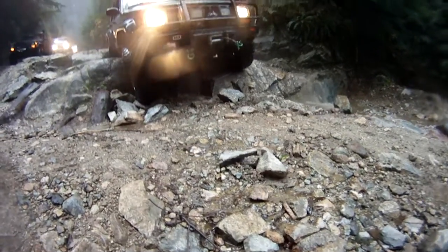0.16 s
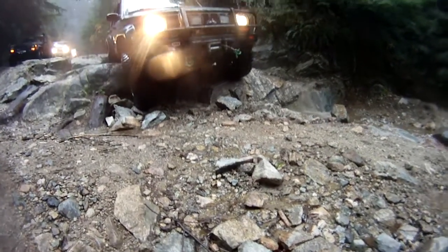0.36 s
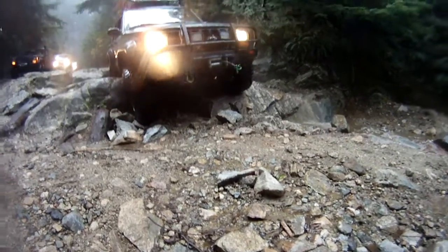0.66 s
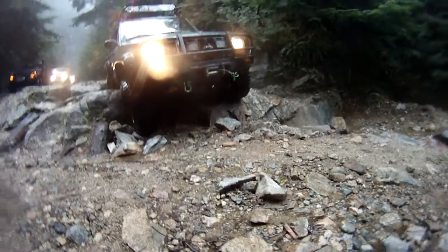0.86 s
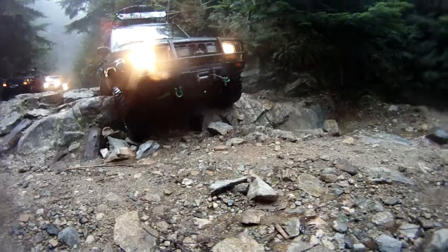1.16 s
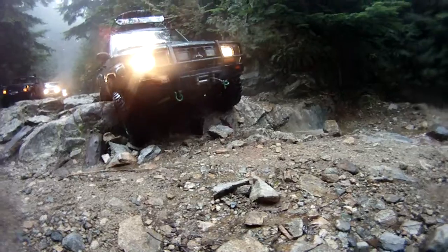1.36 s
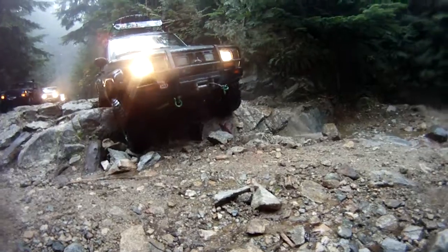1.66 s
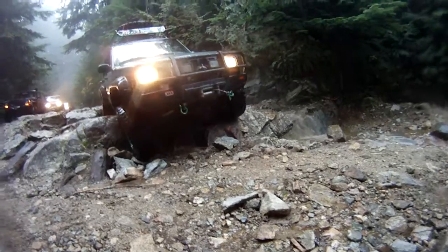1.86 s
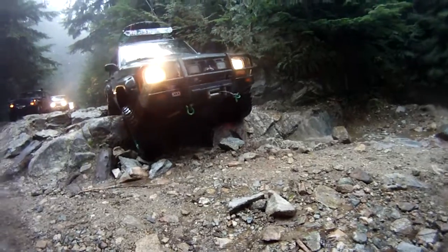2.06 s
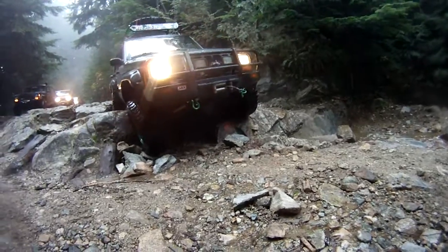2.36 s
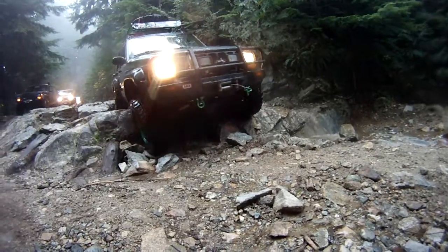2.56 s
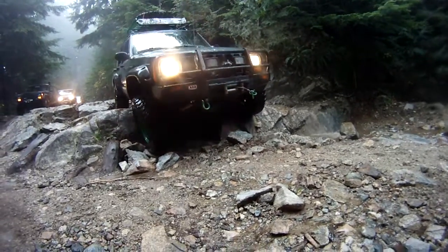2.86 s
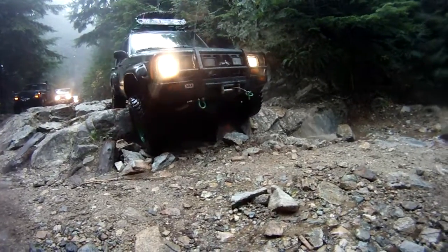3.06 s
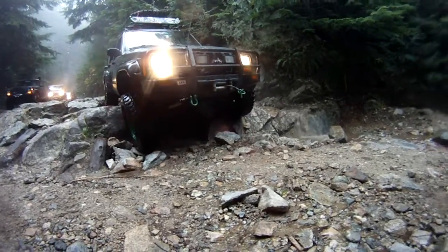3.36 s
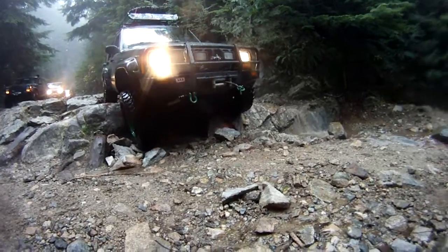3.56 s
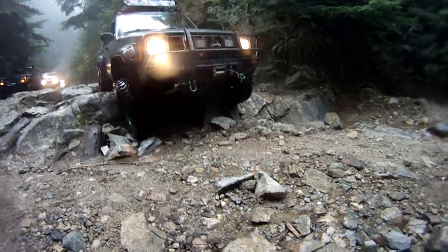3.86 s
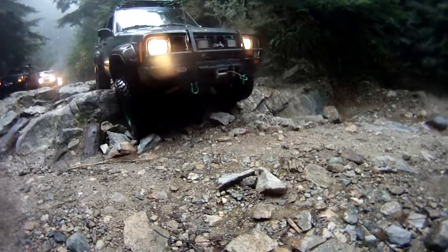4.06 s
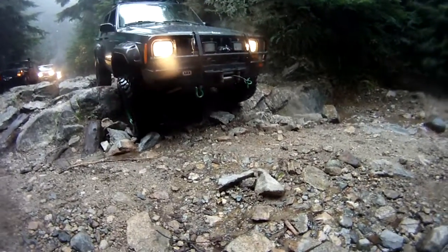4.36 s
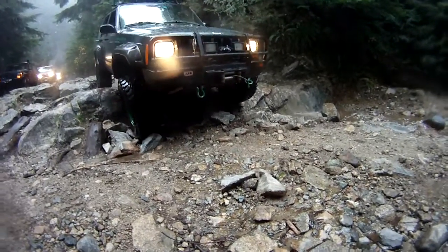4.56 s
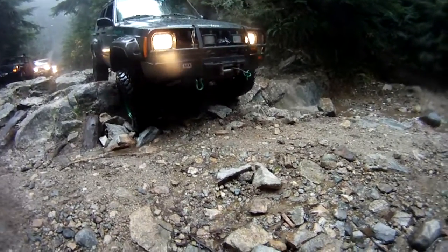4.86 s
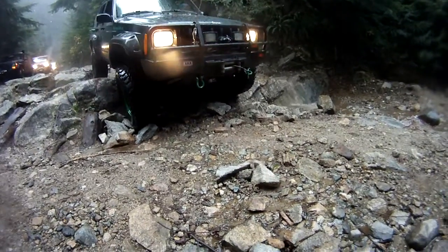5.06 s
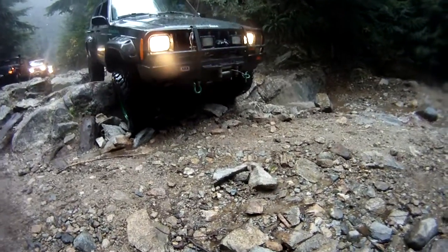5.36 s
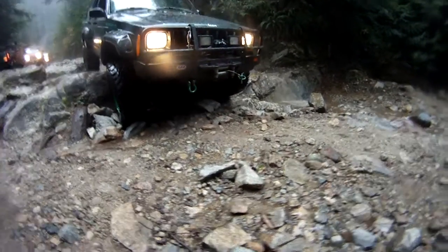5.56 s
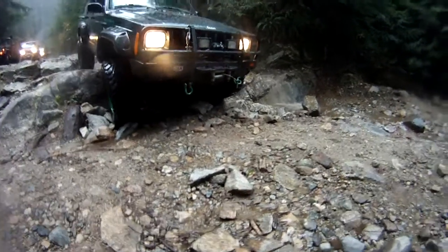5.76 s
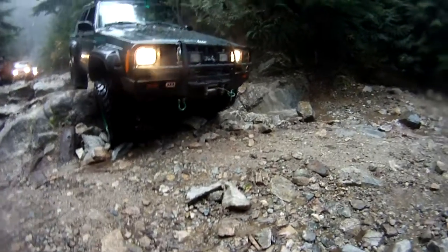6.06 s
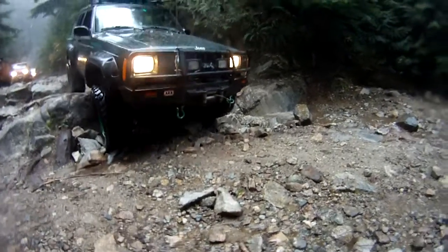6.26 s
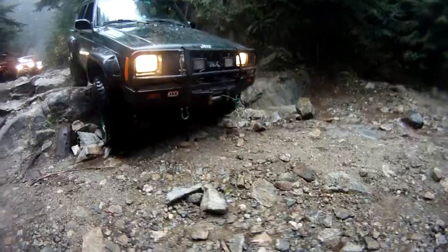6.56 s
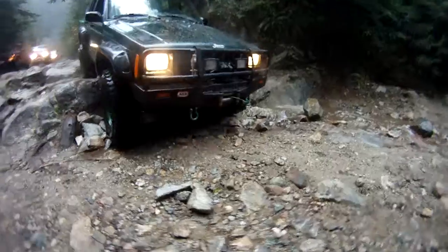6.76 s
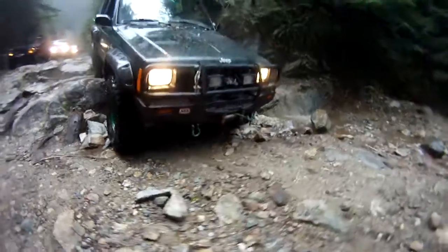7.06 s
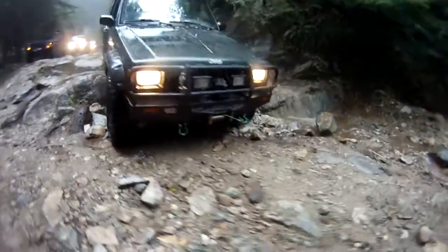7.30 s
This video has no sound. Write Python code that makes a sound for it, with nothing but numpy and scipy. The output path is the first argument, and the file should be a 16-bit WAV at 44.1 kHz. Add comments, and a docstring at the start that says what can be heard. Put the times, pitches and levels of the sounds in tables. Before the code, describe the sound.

Throughout, an engine drones at low speed, around 105-110 Hz with lower and higher orders fluttering, under a nearly steady airy fan and tyre rush and a deep, wavering chassis rumble. Stone ticks and a short gravel crunch open the clip; another crunch comes at 0.8 s and a longer gritty one around 1.75. At 2.6-2.8 a soft low boom, sharp tick and grinding crunch. At 4.0 a dull tick, low boom and heavy crunch lead into the loudest event, 4.13-4.4: a sharp bang of bouncing plastic mount knocks, body thumps, panel shudder and a ringing metal rack fading slowly. A smaller knock at 4.7, deep thuds at 4.97 and 5.13, gravel clicks near 5.4, a light knock at 5.5. Calmer rolling follows, then knocks and chatter at 6.84-7.0 and faint crunching to the 7.4 s end. Boxy near 2 kHz, with glassy treble.

```python
"""A forest trail of loose rock: an off-road truck crawls along, heard from a camera in a case on a vehicle.
The engine drones as a stack of firing orders under filtered-noise fan and tyre rush; the chassis rumbles.
Tyres crunch gravel in bursts of grains, among short noise ticks and low sine booms of tyres and body.
Jolts ring the modes of the body and the rack; the camera mount knocks and chatters.
The case colours the noisy sounds near 2 kHz, and the recorder's coarse sampling adds a glassy top."""
import sys
import numpy as np
from scipy import signal
from scipy.fft import rfft, irfft, next_fast_len
from scipy.io import wavfile
from scipy.ndimage import map_coordinates

SR = 44100
rng = np.random.default_rng(int(sys.argv[2]) if len(sys.argv) > 2 else 0)


def dump_mix(stems):
    """Bounce the given channels to the path in sys.argv[1] as a 16-bit WAV at rate SR."""
    frames = np.atleast_2d(stems).T  # one column per channel
    limited = np.clip(frames, -1, 1)  # hard clip at full scale
    pcm = np.round(limited * 32767).astype(np.int16)
    wavfile.write(sys.argv[1], SR, pcm)


N = 327663
TIME = np.arange(N) / SR

# The suspension jolts; levels are the drive to each part before its own envelope or filter:
# start_s, body_db, rack_db, shudder_db, mount_chatter_db
JOLT_TIMES = [(4.12, -44, -50, -47, -49), (4.14, -32, -35, -40, -42.5), (4.23, -35, -58, -42, -45),
              (4.305, -38, -32.5, -44, -43.5), (4.369, -40, -41.5, -57, -55),
              (4.698, -32, -41.5, -47, -53.5), (4.968, -26.5, -55, -48, -47),
              (5.125, -20.5, -43.5, -43.5, -55), (5.492, -35.5, -54, -58, -63), (6.855, -32, -59, -55, -39),
              (6.949, -36, -52, -50.5, -63), (7.027, -45, -68, -59, -41.5), (7.265, -34.5, -63, -64, -41),
              (7.355, -53, -64, -67, -43)]
# Spectrum of bright gravel grit: frequency_hz, density_db_per_hz (relative)
GRIT_SPECTRUM = [(150, -36), (500, -6), (1200, -9), (2500, 9), (3800, 6.5), (4500, -3.5), (5400, -2.5),
                 (6000, -3.5)]


def amp(db):
    """Decibels to gain."""
    return 10 ** (np.asarray(db) / 20)


def unit(x):
    """Scale to rms 1."""
    return x / np.sqrt(np.mean(x ** 2) + 1e-20)


def curves(rows):
    """One value per sample for each column after the time."""
    s, *cols = np.transpose(rows)
    return [np.interp(TIME, s, c) for c in cols]


def wobble(rate):
    """A smooth random curve, rate knots a second."""
    knots = rng.standard_normal(int(N * rate / SR) + 4)
    return map_coordinates(knots, [TIME * rate])


def swell(middle, reach):
    """A bell-shaped rise and fall, down to 1/e^2 at reach seconds either side of the middle."""
    return np.exp(-2 * ((TIME - middle) / reach) ** 2)


def surge(s, rise, t60):
    """A quick rise from time s, then an exponential fall."""
    t = np.maximum(TIME - s, 0)
    return (1 - np.exp(-t / rise)) * amp(-60 * t / t60)


def add(track, s, sound):
    """Mix a sound into a track at time s."""
    part = track[max(round(s * SR), 0):][:len(sound)]
    part += sound[:len(part)]


def filtered(x, response):
    """x times a response of frequency."""
    size = next_fast_len(len(x) + SR // 4)
    hz = np.fft.rfftfreq(size, 1 / SR)
    return irfft(rfft(x, size) * response(hz), size)[:len(x)]


def dulled(x, edge_hz, order):
    """A causal low-pass."""
    return signal.sosfilt(signal.butter(order, edge_hz, fs=SR, output="sos"), x)


def coloured(x, spectrum):
    """x through a causal filter: the source's spectrum plus the resonances of the case."""
    # Resonances of the camera case: centre_hz, half_width_hz (to 1/e of the lift), lift_db
    case_peaks = [(1206, 159, 7), (1385, 44, 8.5), (2082, 303, 15.5), (3040, 152, 5), (3460, 117, 5.5),
                  (3910, 113, 4.5), (4798, 142, 6.5), (5230, 176, 5.5)]
    hz = np.fft.rfftfreq(2 ** 14, 1 / SR)
    f, db = np.transpose(spectrum)
    level = np.interp(np.log(hz + 1), np.log(f), db)
    level = level + sum(lift * np.exp(-((hz - c) / w) ** 2) for c, w, lift in case_peaks)
    # folding the cepstrum forward gives minimum phase: nothing sounds early
    cepstrum = irfft(np.log(amp(level)))
    cepstrum[1:len(hz) - 1] *= 2
    cepstrum[len(hz):] = 0
    impulse = irfft(np.exp(rfft(cepstrum)))
    return signal.fftconvolve(x, impulse)[:len(x)]


def ring(modes, scatter_db, attack):
    """One blow on a set of decaying modes, at new strengths each time; peak 1."""
    t = TIME[:int(SR * max(t60 for _, _, t60 in modes))]
    sound = np.zeros(len(t))
    for hz, db, t60 in modes:
        strength_db = db + scatter_db * rng.standard_normal()
        sound += amp(strength_db - 60 * t / t60) * np.sin(2 * np.pi * hz * t)
    sound = sound * (1 - np.exp(-t / attack))
    return sound / np.abs(sound).max()


def grains(rate, spread_db):
    """Random tiny impacts of uneven size, rms 1."""
    hit = rng.random(N) < rate / SR
    size = amp(spread_db * np.clip(rng.standard_normal(N), -2, 2))
    return unit(hit * size * np.sign(rng.standard_normal(N)))


def engine():
    """Low firing orders on a slightly uneven speed, with fan and tyre rush above them."""
    # Course of the main drone: time_s, drone_hz, drone_db (level shared by all the orders)
    engine_course = [(0, 111.6, -60.5), (1, 109.4, -61), (1.8, 103.8, -62.5), (2.7, 109.1, -61.5),
                     (3.5, 104.7, -64), (4.8, 108, -62.5), (5.8, 110.1, -66), (7.43, 107, -66)]
    # Harmonics of the firing rate, the third being the drone: multiple, relative_level_db
    firing_orders = [(1, 2), (1.5, -3), (2, -7), (2.5, -10), (3, 2.5), (3.5, -4), (4, -8.5), (4.5, -7.5),
                     (5, -15.5), (5.5, -8)]
    # Spectrum of the rush: frequency_hz, density_db_per_hz (relative)
    air_spectrum = [(80, -22.5), (250, 2), (360, -1), (480, 0.5), (900, -2), (1600, -0.5), (2500, 3),
                    (3700, 2), (4300, -6), (5400, -3), (6000, -9.5)]
    rush_db, rush_wander_db = -49.5, -0.15  # nearly steady rush, and its slow drift
    drone_hz, drone_db = curves(engine_course)
    firing_hz = drone_hz / 3
    phase = 2 * np.pi * np.cumsum(firing_hz * (1 + 0.0279 * wobble(16))) / SR
    drone = np.zeros(N)
    for k, db in firing_orders:
        # uneven combustion makes each order flutter
        flutter = amp(db + 2.43 * wobble(7.2))
        drone += flutter * np.sin(k * phase + 2 * np.pi * rng.random())
    texture = rng.standard_normal(N) + 0.5 * grains(rate=700, spread_db=2)
    # the rush pulses faintly at the firing rate
    rush = unit(coloured(texture * (1 + 0.057 * np.cos(phase)), air_spectrum))
    rush_level = amp(rush_db + rush_wander_db * wobble(2.054) + 0.85 * wobble(12))
    return drone * amp(drone_db) + rush * rush_level


def chassis():
    """The body rumbles on its springs; jolts swell the rumble, thump body, shake panels and ring the rack."""
    # Rumble over the ground: time_s, rumble_db
    ground_shake = [(0, -53), (0.9, -46), (1.7, -50), (2.2, -48), (3.2, -54.5), (3.9, -48.5), (4.6, -47.5),
                    (5.4, -44.5), (6.1, -47.5), (6.7, -48), (7.43, -42)]
    # Spectrum of the rumble: frequency_hz, density_db_per_hz (relative)
    rumble_spectrum = [(10, -19), (22, -12.5), (35, 6), (42, -1), (52, -5), (65, -15), (100, -17),
                       (135, -27.5), (190, -20), (250, -32), (400, -49.5), (900, -63.5)]
    # Modes of the vehicle body: frequency_hz, relative_level_db, t60_s
    body_modes = [(36.4, -1, 0.7), (51.9, 1, 0.35), (71, 4, 0.11), (98.5, -8.5, 0.24), (141, 2.5, 0.09),
                  (175, -15, 0.37), (199.3, -8.5, 0.27), (257, -33, 0.068), (490, -6.5, 0.026),
                  (1056, -7, 0.059), (1180, 3, .02), (1410, -18, .012)]
    # Modes of the steel rack that rings on after a jolt: frequency_hz, relative_level_db, t60_s
    rack_modes = [(178, 0.5, 0.34), (188.5, -2.5, 0.75), (199.5, -0.5, 0.8), (236.3, -8, 3.56),
                  (309, -10.5, 1.13), (378, -15, 1.5), (460, -12, 0.68), (626, -26, 1.4), (740, -10, .8),
                  (865, -11.5, 0.43), (1092, -7.5, 0.5), (1257, -4.5, 0.51)]
    # Spectrum of loose panels shuddering after a jolt: frequency_hz, density_db_per_hz (relative)
    panel_spectrum = [(80, -7), (250, -5), (400, -5.5), (620, 1), (900, -4), (1080, 9), (1300, -9.5),
                      (1700, -22), (2200, -45), (5000, -68)]
    wander_db, wanders_per_s = 1.5, 6  # small unevenness of the ground
    sway_db, sway_rise_s, sway_t60_s = -6, 0.014, 0.65  # drive of the swell, relative to the jolt's thump
    shake_db, = curves(ground_shake)
    rolling = amp(shake_db + wander_db * wobble(wanders_per_s))
    sway = sum(amp(body_db + sway_db) * surge(s, sway_rise_s, sway_t60_s)
               for s, body_db, *_ in JOLT_TIMES)
    rumble = unit(coloured(rng.standard_normal(N), rumble_spectrum)) * np.hypot(rolling, sway)
    blows = np.zeros(N)
    t = TIME[:SR // 2]
    # a short clunk, then a fading rattle
    fade = 2.8 * amp(-60 * t / 0.023) + 0.47 * amp(-60 * t / 1.1)
    for s, body_db, rack_db, shudder_db, _ in JOLT_TIMES:
        add(blows, s, amp(body_db) * ring(body_modes, scatter_db=3.0, attack=0.0016))
        add(blows, s, amp(rack_db) * ring(rack_modes, scatter_db=2.0, attack=0.0085))
        panels = unit(coloured(rng.standard_normal(len(t)), panel_spectrum))
        add(blows, s, amp(shudder_db) * fade * panels)
    return rumble + blows


def ticks():
    """Short decaying noise ticks: sharp ones from stones, dull ones ringing in the case near 2 kHz."""
    # Short ticks: start_s, peak_db, brightness (negative dull, positive sharp)
    tick_times = [(.035, -39, -1.1), (.088, -31, 1), (1.429, -35, .9), (2.680, -35, -1.54),
                  (2.738, -28.5, 1), (3.245, -37, -0.6), (3.9835, -28.5, -1.59), (5.277, -34.5, 0.58),
                  (5.362, -28.5, -0.49), (5.797, -34.5, -1.3), (5.838, -30, 0.49), (6.838, -30, -0.77)]
    track = np.zeros(N)
    t = TIME[:SR // 20]
    for s, db, bright in tick_times:
        # above 2 kHz the grit's spectrum tilts up for sharp ticks and down for dull ones
        tilted = [(hz, level + 12 * bright * np.log2(max(hz / 2000, 1))) for hz, level in GRIT_SPECTRUM]
        tick = coloured(rng.standard_normal(len(t)) * amp(-60 * t / 0.017), tilted)
        add(track, s, amp(db) * tick / np.abs(tick).max())
    return track


def tyres():
    """Gravel gives way under the tyres in bursts of bright grit over a dull grinding."""
    # A tyre crushes gravel: middle_s, reach_s (each side), grit_db, grinding_db
    crunch_times = [(0.097, 0.03, -45.5, -57), (0.775, 0.044, -47.5, -54), (1.75, 0.29, -49.5, -60),
                    (2.694, 0.022, -46, -48), (2.736, 0.35, -63.5, -54.5), (2.766, 0.049, -55, -47),
                    (3.633, 0.015, -48, -57), (3.992, 0.041, -43, -39.5), (4.46, 0.056, -46, -59),
                    (5.372, 0.018, -41, -50), (5.437, 0.14, -52.5, -52.5), (5.986, 0.043, -49.5, -57),
                    (6.81, 0.095, -52.5, -70), (7.059, .05, -45.5, -74), (7.373, 0.2, -53.5, -68)]
    # Spectrum of the grinding: frequency_hz, density_db_per_hz (relative)
    grind_spectrum = [(40, -22), (100, 10), (190, 2), (300, 2.5), (450, 1), (800, -3), (1400, -8),
                      (2200, -11), (5000, -46)]
    clump_db, clumps_per_s = 0.5, 110  # gravel gives way unevenly
    grit = unit(coloured(grains(rate=1800, spread_db=6), GRIT_SPECTRUM))
    grind = unit(coloured(grains(rate=1500, spread_db=4.5), grind_spectrum))
    crunch = np.zeros(N)
    for s, reach, grit_db, grind_db in crunch_times:
        crunch += swell(s, reach) * (amp(grit_db) * grit + amp(grind_db) * grind)
    return crunch * amp(clump_db * wobble(clumps_per_s))


def booms():
    """Low booms and hums of tyres and body, short or drawn out: swelling sines of slightly unsteady pitch."""
    # Booms and hums: middle_s, reach_s (each side), pitch_hz, rms_db (at the middle)
    boom_times = [(0.617, 0.06, 100, -48.5), (2.57, 0.028, 161, -52), (2.598, 0.12, 107.4, -54),
                  (3.35, 0.65, 84, -61), (3.993, 0.036, 92, -37.5), (5.023, .025, 185, -40),
                  (5.196, 0.14, 98.7, -45)]
    drift = 0.42 * wobble(30)  # phase, radians
    track = np.zeros(N)
    for s, reach, hz, db in boom_times:
        tone = np.sqrt(2) * np.sin(2 * np.pi * hz * TIME + drift)
        track += amp(db) * swell(s, reach) * tone
    return track


def bounces(count):
    """(s, dB) of every contact of the mount: each knock rebounds, weaker each time."""
    # The mount knocks in its seat and bounces (levels before the low-pass):
    # start_s, level_db, flight_s (between contacts), loss_db (per bounce)
    seat_knocks = [(4.1346, -19.5, 0.012, 14), (4.1527, -10.5, 0.0048, 5.5), (4.2284, -38, 0.0064, 10),
                   (4.2812, -19, 0.0082, 5), (4.3036, -15, 0.0087, 9), (4.379, -21.5, 0.0053, 7),
                   (4.6951, -26, 0.0055, 19), (5.126, -35.5, .005, 3), (5.492, -30, 0.0046, 7),
                   (6.841, -28.5, 0.0087, 0.5), (6.929, -34.5, 0.0048, 8), (6.949, -41, .005, 13)]
    return [(s + k * flight, db - k * loss_db)
            for s, db, flight, loss_db in seat_knocks for k in range(count)]


def mount():
    """The loose plastic mount knocks and rebounds on the big jolts and chatters on after each one."""
    # Modes of the camera mount: frequency_hz, relative_level_db, t60_s
    mount_modes = [(910, -36, .1), (1099, -10.5, 0.12), (1197, -7, 0.036), (1237, -11.5, 0.058),
                   (1447, -10.5, 0.045), (1730, -28, 0.0072), (1907, 12, 0.017), (1990, -12, 0.036)]
    chatter_rise_s, chatter_t60_s = 0.0084, 0.53
    knocks = np.zeros(N)
    t = TIME[:SR // 10]
    # the contact itself is a brief crack that scuffs away, too small to radiate bass
    scuff = 0.5 * amp(-60 * t / 0.01) + 0.1 * amp(-60 * t / 0.12)
    for s, db in bounces(count=3):
        modes = ring(mount_modes, scatter_db=1.5, attack=0.001)
        crack = filtered(scuff * rng.standard_normal(len(t)),
                         lambda hz: np.interp(hz, [800, 1100], [0.35, 1]))
        add(knocks, s, amp(db) * modes)
        add(knocks, s, amp(db) * crack)
    tap = ring(mount_modes, scatter_db=0.5, attack=0.0006)
    taps = signal.fftconvolve(grains(rate=550, spread_db=3), tap)[:N]
    chatter_level = sum(amp(db) * surge(s, chatter_rise_s, chatter_t60_s) for s, *_, db in JOLT_TIMES)
    chatter = unit(taps) * chatter_level
    # blunt contacts have little treble
    return dulled(knocks + chatter, edge_hz=2210, order=10)


def scene():
    """Everything as it arrives inside the camera case."""
    return (engine() + chassis() + ticks() + tyres() + booms() + mount())[None]


def record(dry):
    """The recorder samples slowly and holds each value, which mirrors the sound into the treble."""
    hold_hz, top_hz = 12000, 15500  # coarse sampling rate, upper limit of the sound
    band = filtered(dry[0], lambda hz: np.clip((hold_hz / 2 + 150 - hz) / 600, 0, 1))
    # sampling copies the band to either side of the sampling rate
    mirrored = band * (1 + 2 * np.cos(2 * np.pi * hold_hz * TIME))
    # holding each value droops the treble as a sinc
    return filtered(mirrored, lambda hz: np.sinc(hz / hold_hz) * (hz < top_hz))[None]


dry = scene()
out = record(dry)
dump_mix(out)
```